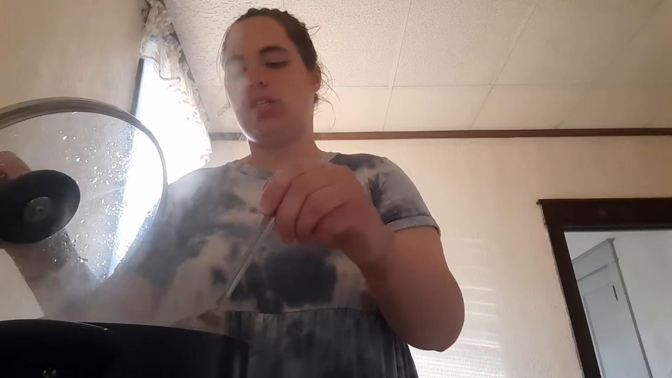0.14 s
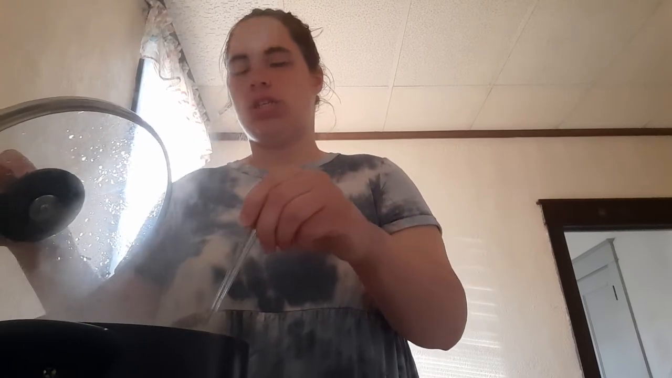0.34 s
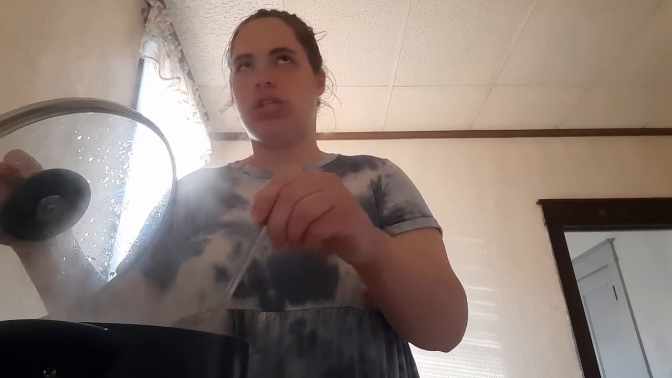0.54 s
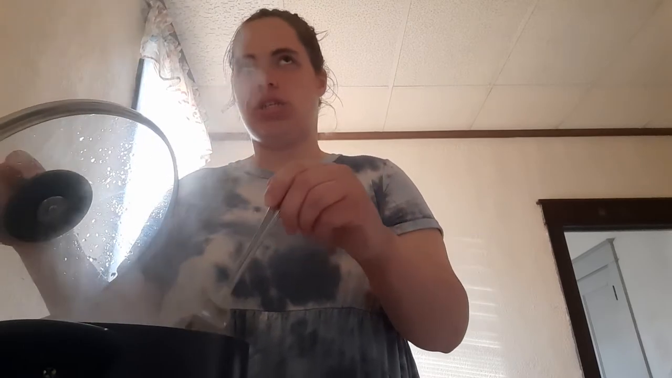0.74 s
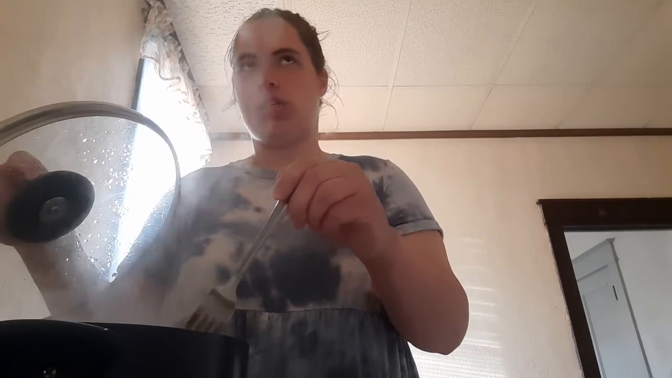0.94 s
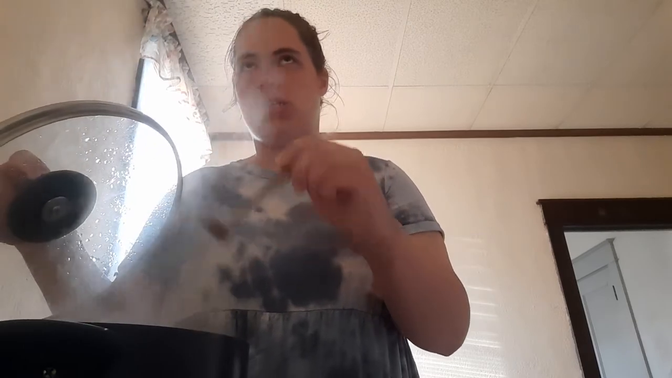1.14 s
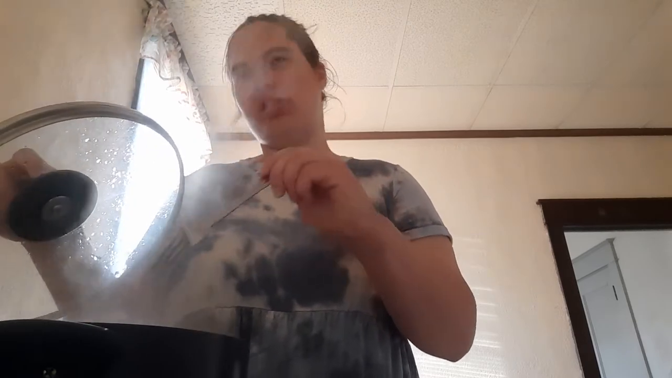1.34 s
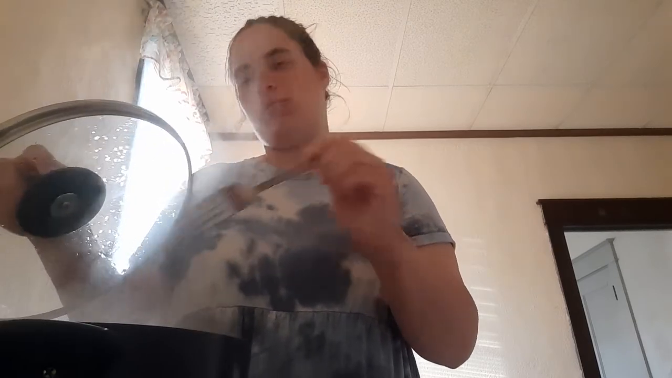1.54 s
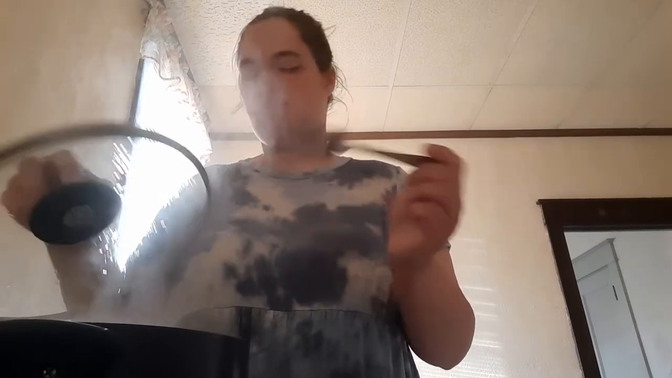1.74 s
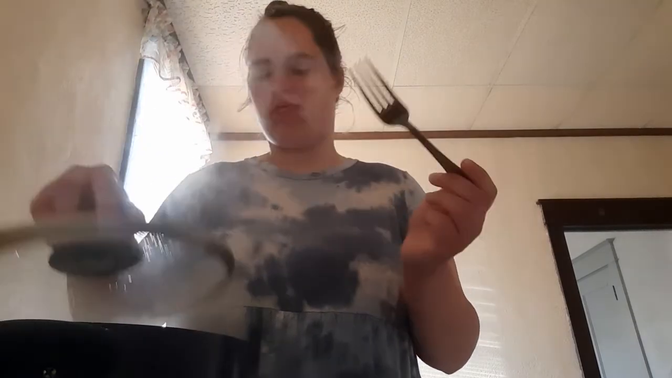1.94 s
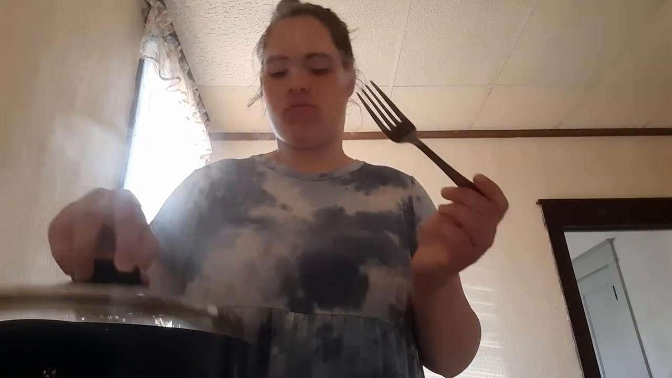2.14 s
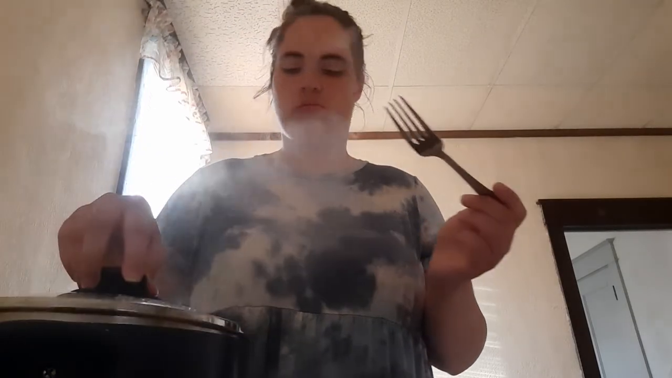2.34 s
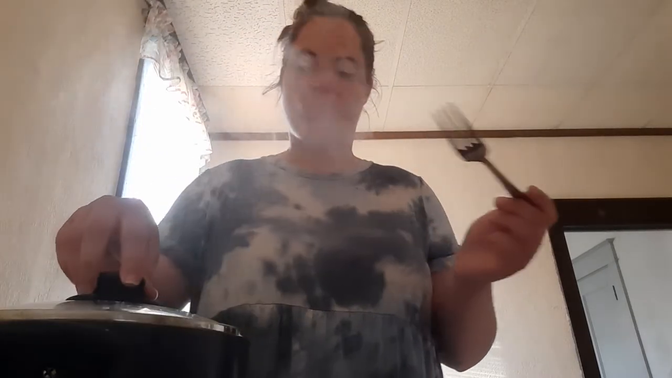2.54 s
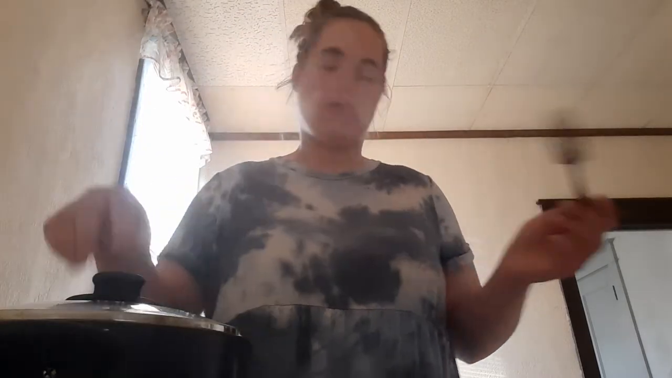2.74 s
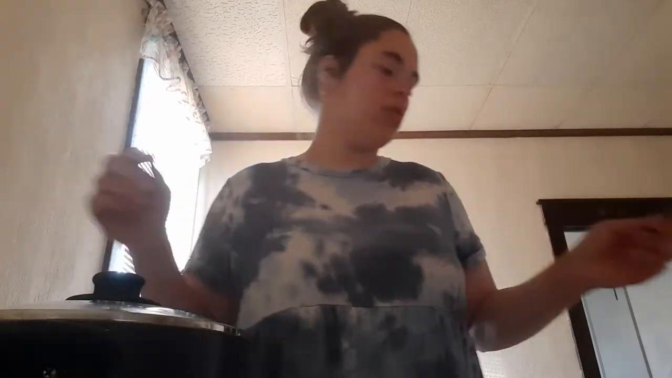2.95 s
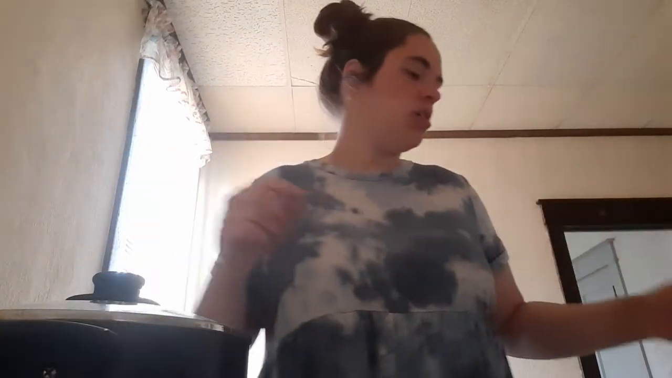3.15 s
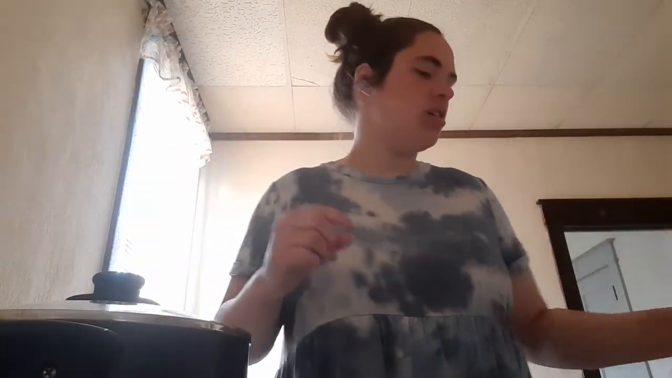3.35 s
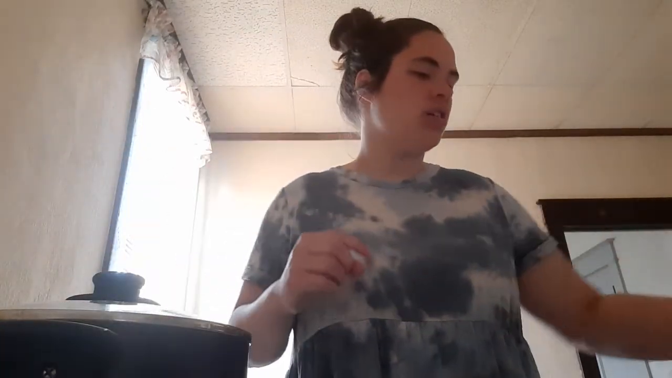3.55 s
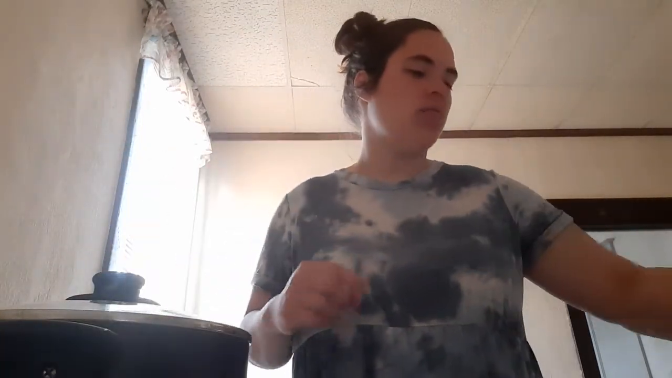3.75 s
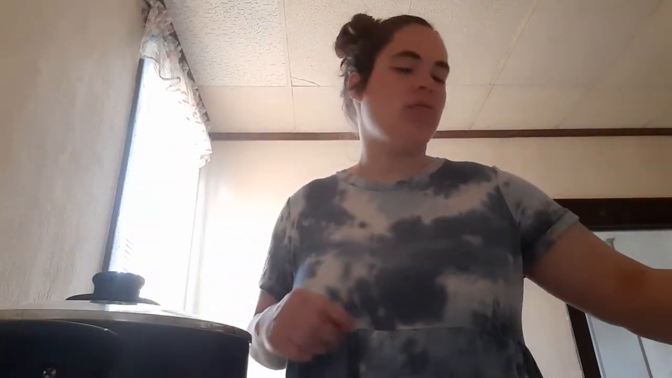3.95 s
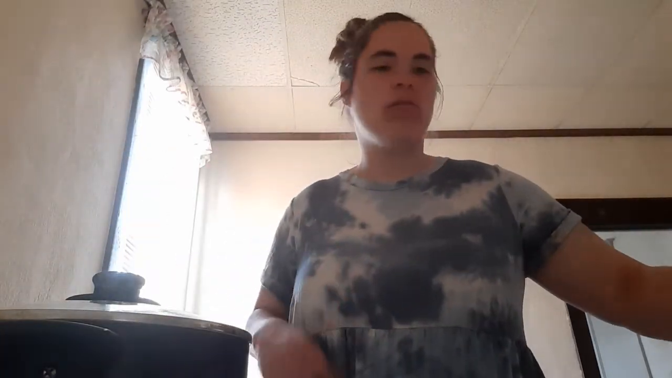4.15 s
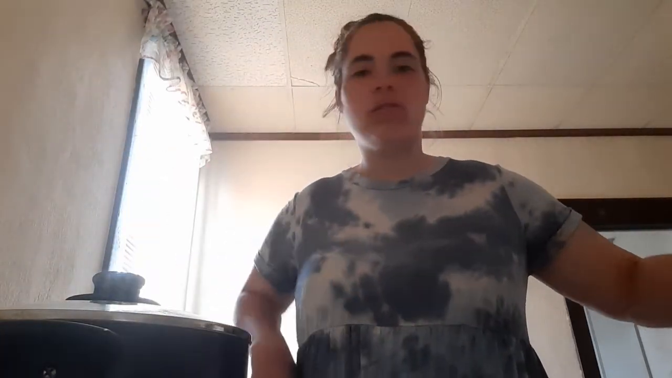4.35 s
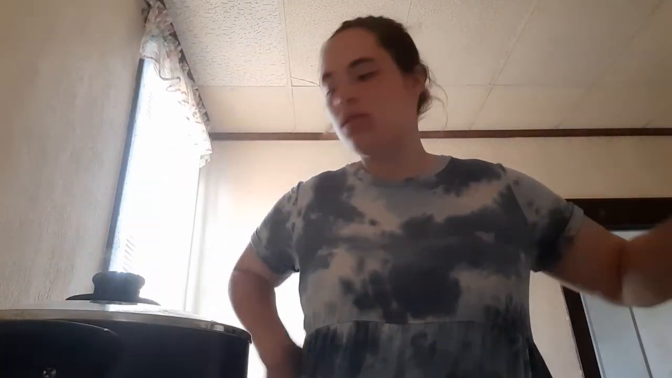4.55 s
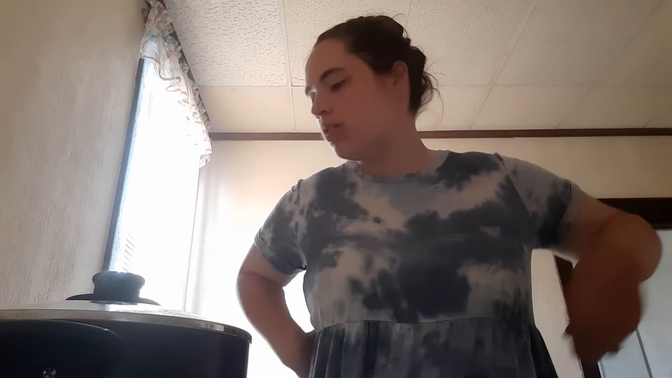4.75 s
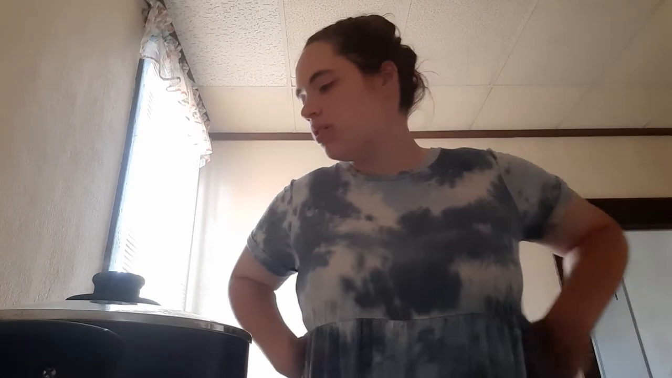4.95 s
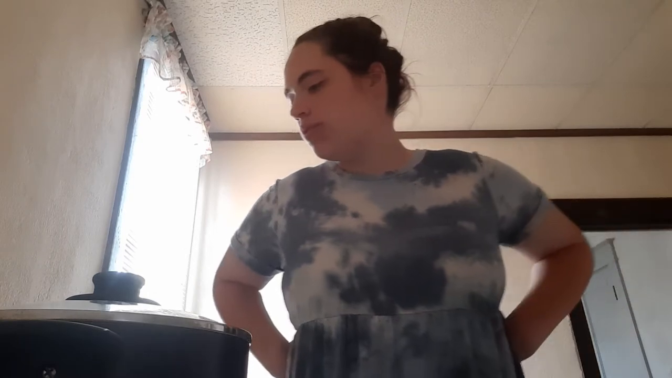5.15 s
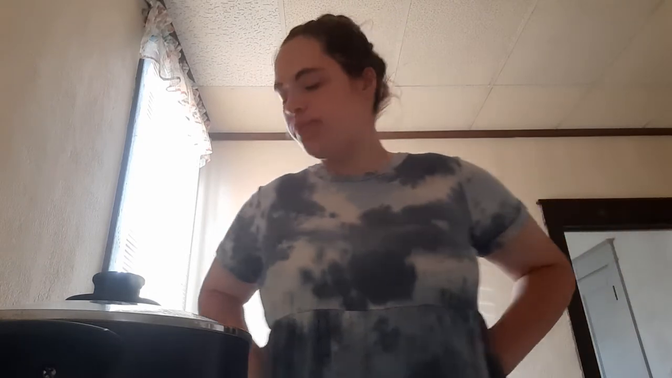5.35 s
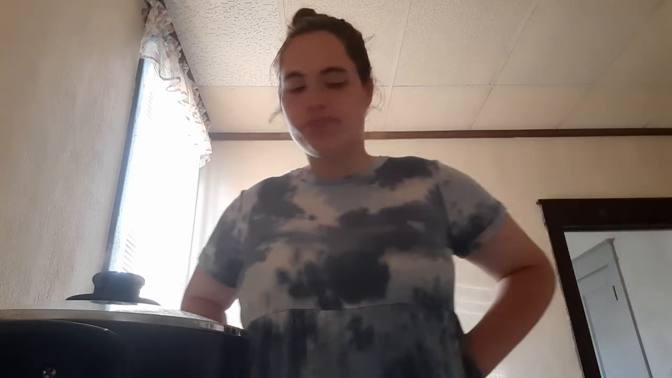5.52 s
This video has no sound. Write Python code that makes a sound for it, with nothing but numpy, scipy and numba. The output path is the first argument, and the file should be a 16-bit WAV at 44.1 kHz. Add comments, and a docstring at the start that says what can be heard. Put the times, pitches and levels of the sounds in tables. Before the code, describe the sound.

Close bubbling and steam, faint fork touches, a quick rocking lid clank, and later a metal fork rattling down onto a worktop.

```python
"""Lid and fork beside a boiling pot

Potatoes boil in a steel pot in a small kitchen while a fork prods them with light touches and plops.
A glass lid rocks into its seat, as knocks and decaying modes; the fork is put down on a hard top and
chatters to rest in ever quicker taps. Gliding bubbles, churning and droplets over filtered noise make the
water and steam, close to a two-port microphone whose gain sinks in loud moments and creeps back."""
import sys
import numpy as np
from scipy import signal
from scipy.fft import rfft, irfft
from scipy.io import wavfile
from scipy.ndimage import uniform_filter1d
from numba import njit

SR = 44100
rng = np.random.default_rng(int(sys.argv[2]) if len(sys.argv) > 2 else 0)


def store_pcm(level_fs):
    """Save levels as 16-bit WAV."""
    pcm = np.round(np.clip(level_fs, -1, 1) * 32767).astype(np.int16)
    wavfile.write(sys.argv[1], SR, np.atleast_2d(pcm).T)


N = 250664
T = np.arange(N) / SR


def undb(db):
    """Level law: decibels to amplitude gain."""
    return 10 ** (np.asarray(db) / 20)


def unit(x):
    """Energy normalisation: each channel's squares sum to one."""
    return x / np.sqrt(np.sum(x ** 2, axis=-1, keepdims=True))


def add(out, s, x):
    """Superposition: mix x into out from time s on."""
    i = max(int(s * SR), 0)
    out[:, i:i + x.shape[-1]] += x[..., :max(N - i, 0)]


def convolve(x, response):
    """Linear filtering: pass x through an impulse response, keeping its length."""
    return signal.fftconvolve(np.atleast_2d(x), np.atleast_2d(response), axes=1)[:, :x.shape[-1]]


def colour(points, size=2048):
    """Minimum phase: the causal unit-energy response with the given (Hz, dB) spectral shape."""
    hz, db = np.transpose(points)
    grid_hz = np.arange(size // 2 + 1) * SR / size
    gain = undb(np.interp(np.log(grid_hz + 1), np.log(hz), db))
    # folding the cepstrum onto positive time makes the response causal
    cepstrum = irfft(np.log(gain))
    cepstrum[1:size // 2] *= 2
    cepstrum[size // 2 + 1:] = 0
    return unit(irfft(np.exp(rfft(cepstrum))))


def lowpass(x, hz, order=2):
    """Butterworth low-pass: a maximally flat passband below hz."""
    return signal.sosfilt(signal.butter(order, min(hz, SR / 2 - 500), fs=SR, output="sos"), x)


def wash(t60_low, t60_high, size=4096, count=15):
    """High modal density: white noise, unrelated left and right, each band decaying at its own rate."""
    t, hz = np.arange(size) / SR, np.arange(size // 2 + 1) * SR / size
    edges = np.r_[0, np.geomspace(90, SR / 2, count)]
    decay_times = np.geomspace(t60_low, t60_high, count)  # seconds to fall 60 dB
    noise, out = rfft(rng.standard_normal((2, size))), 0
    for lo, hi, t60 in zip(edges, edges[1:], decay_times):
        in_band = (hz >= lo) & (hz < hi)
        band = irfft(noise * in_band) * np.exp(-np.log(1000) * t / t60)
        # energy in proportion to bandwidth keeps the sum white
        out = out + unit(band) * np.sqrt(hi - lo)
    return unit(out)


def ring(modes, size=16384):
    """Modal synthesis: damped sines, with phases that differ less between the ports in the bass."""
    t, out = np.arange(size) / SR, 0
    for hz, db, t60 in modes:
        phase = rng.uniform(-0.96, 1, (2, 1)) * min(hz / 3000, np.pi / 2)
        decay = np.exp(-np.log(1000) * t / t60)
        out = out + undb(db) * unit(np.sin(2 * np.pi * hz * t + phase) * decay)
    return out


def knock(shape, t60_low, t60_high, rattle_db, size=16384):
    """Impact excitation: a one-sample crack and a brief dense ring, in the colour of the object."""
    burst = undb(rattle_db) * wash(t60_low, t60_high)
    burst[:, 0] += 1
    padded = np.pad(unit(burst), ((0, 0), (0, size - burst.shape[1])))
    return convolve(padded, shape)


def spring(x, hz, q):
    """Contact compliance: a second-order resonance that rings near hz and passes little above."""
    w = 2 * SR * np.tan(np.pi * min(hz, SR / 2 - 2000) / SR)
    return signal.lfilter(*signal.bilinear([w * w], [1, w / q, w * w], SR), x)


def place(x, lead_ms, left_db):
    """Interaural cues: the left port leads by lead_ms and is louder by left_db (negative: the right)."""
    size = 2 ** 18
    lag = np.maximum([-lead_ms, lead_ms], 0) / 1000  # seconds, left and right
    hz = np.arange(size // 2 + 1) * SR / size
    delay = np.exp(-2j * np.pi * lag[:, None] * hz)
    return irfft(rfft(x, size) * delay)[:, :N] * undb([[left_db / 2], [-left_db / 2]])


def walk(rate):
    """Random modulation: straight lines between normal draws, rate of them a second."""
    steps = np.arange(0, 6, 1 / rate)
    return np.interp(T, steps, rng.standard_normal(len(steps)))


def lid():
    """Impact and modal decay: the steel-rimmed glass lands on an edge, rocks and slips into its seat."""
    # Each row: start in seconds, strength in dB, contact resonance in Hz, click of the steel rim in dB.
    lid_hits = [(2.067, 9, 1480, 10), (2.1335, 9, 590, -1), (2.153, -1.5, 2400, -4), (2.1667, 13, 513, -3),
                (2.178, 14, 500, -4), (2.1863, 11, 1300, 5.5), (2.19, 1, 2470, -21), (2.257, -11, 343, -18),
                (2.268, -1.5, 347, -16), (2.288, -11.5, 2650, -8), (2.4042, 0.5, 2470, 0),
                (2.4086, 4.5, 1350, 5), (2.437, -8.5, 1530, -12)]
    # Knock colour of lid and pot. Each row: frequency in Hz, level in dB.
    lid_colour = [(40, -21.5), (75, -15), (120, 2), (250, -4.5), (450, -2), (700, 1), (1050, -13),
                  (1320, -6), (1580, -11), (2200, -6.5), (5000, -19), (9000, -22.5), (16000, -20.5)]
    # Modes of lid and pot. Each row: frequency in Hz, level in dB, 60 dB decay time in seconds.
    lid_modes = [(64.5, -26, 0.57), (120, -11.5, 0.21), (200.3, -18, 0.21), (319.4, -17, 0.13),
                 (484, -17, 0.12), (578.4, -16, 0.2), (615, -14, 0.098), (682, -21, 0.096),
                 (1240, -43, 0.076), (1316, -16, 0.035), (1677, -15, 0.15), (1853, -8.5, 0.043),
                 (2580, -17, 0.049), (3270, -23.5, 0.19), (3997, -23.5, 0.33), (5900, -28, 0.11),
                 (4920, -27.5, 0.18), (8796, -33, .04)]
    # The hand lets the lid's weight onto the pot, from first touch to rest.
    # Each row: time in seconds, gain of the bass in dB.
    lid_weight = [(2.12, -19.5), (2.21, 12)]
    rim_hz = 9500
    out, shape, modes = np.zeros((2, N)), colour(lid_colour), ring(lid_modes)
    for s, db, contact_hz, rim_db in lid_hits:
        blow = knock(shape, t60_low=0.023, t60_high=0.078, rattle_db=7.5) + modes
        # weight behind the blow shakes the whole pot
        weight = undb(np.interp(s, *np.transpose(lid_weight)))
        heavy = blow + (weight - 1) * lowpass(blow, hz=243, order=1)
        body = undb(db) * spring(heavy, contact_hz, q=1.98)
        treble = blow - lowpass(blow, hz=910, order=1)
        click = undb(rim_db) * spring(treble, rim_hz, q=0.77)
        add(out, s, body + click)
    return place(out, lead_ms=0.27, left_db=3.0)


def bounces(s, db, first_gap_s, count=15):
    """Restitution: (s, gain) of bounces that on average weaken and follow sooner, a little unevenly."""
    rebound, loss_db = 0.92, 1.04  # mean flight as a share of the last, mean loss per tap
    gap, size = rng.standard_normal((count, 2)).T
    number = np.arange(count)
    flights = first_gap_s * rebound ** number * np.exp(0.22 * gap)
    starts = s + np.cumsum(flights) - flights
    return zip(starts, undb(db - loss_db * number + 2 * size))


def fork(count=4):
    """Coupled impact: the handle knocks the board, then the tines land and buzz in quicker bounces."""
    # Each row: start in seconds, knock on the board in dB, contact resonance in Hz, clash of tines in dB.
    fork_hits = [(3.862, 16, 6000, 2.5), (3.879, 5, 8000, -1), (3.896, 8, 1070, -21),
                 (3.994, -9, 1780, -20), (4.035, 2.5, 575, -22), (4.1003, 13, 5630, -3.5),
                 (4.1107, 6.5, 5600, -4), (4.142, 2, 5000, -4.5), (4.1685, 20, 482, 16),
                 (4.1972, 8.5, 3000, 11)]
    # Each end of the fork chatters to rest.
    # Each row: start in seconds, strength in dB, mean first gap between bounces in seconds.
    chatter = [(4.179, 10, .0088), (4.254, 8.5, .0062)]
    # Knock colour of the worktop. Each row: frequency in Hz, level in dB.
    board_colour = [(45, -33), (100, -21), (250, 2.5), (420, -11.5), (780, 3.5), (1060, 6), (1230, -13),
                    (1580, 3), (2050, 3.5), (3200, -7.5), (4800, -14.5), (6200, -13), (8500, -44),
                    (16000, -8.5)]
    # Modes of the worktop. Each row: frequency in Hz, level in dB, 60 dB decay time in seconds.
    board_modes = [(109.4, -27.5, 0.28), (568, -21, 0.19), (845, -15, 0.33), (1010, -31, 0.092),
                   (1660, -24, .18), (2022, -13, .14), (2460, -42, 0.19)]
    # Clash colour of the fork. Each row: frequency in Hz, level in dB.
    tine_colour = [(50, -12), (110, -14.5), (270, 2), (650, -3), (1250, -5), (1850, -1), (2700, 4.5),
                   (3300, -5.5), (4000, -0.5), (4900, -11.5), (6500, -6.5), (8800, -10), (12000, -3),
                   (16000, -12.5)]
    # Modes of the fork. Each row: frequency in Hz before detuning, level in dB before tine_ring_db,
    # 60 dB decay time in seconds.
    tine_modes = [(673, -17, .17), (1893, -13.5, .1), (2525, -18, .08), (2010, -14, .16), (2723, -13, .11),
                  (2800, -14, .025), (3922, -18, .06), (4003, -18, .06), (5772, -18, .17), (6269, -16, .1),
                  (6600, -13, .02), (7170, -23, .12), (9180, -23, .1), (10512, -21, .15), (11130, -22, .12),
                  (12376, -20, .12), (13260, -21, .14), (14097, -17, .11), (15630, -22, .06)]
    tine_ring_db = 0.5
    out, board, board_ring = np.zeros((2, N)), colour(board_colour), ring(board_modes)
    tines = colour(tine_colour)
    # the way the fork touches the board detunes it slightly; the contacts take these rings in turn
    tine_rings = []
    for _ in range(count):
        detuned = [(hz * (1 + 0.0012 * rng.standard_normal()), db + tine_ring_db, t60)
                   for hz, db, t60 in tine_modes]
        tine_rings.append(ring(detuned))
    for k, (s, board_db, contact_hz, tine_db) in enumerate(fork_hits):
        thud = knock(board, t60_low=0.084, t60_high=0.044, rattle_db=3.0) + board_ring
        clash = knock(tines, t60_low=0.055, t60_high=0.047, rattle_db=22) + tine_rings[k % count]
        add(out, s, undb(board_db) * spring(thud, contact_hz, q=1.25) + undb(tine_db) * clash)
    # every bounce lands on another spot, so no two taps are alike
    for run in chatter:
        for k, (s, gain) in enumerate(bounces(*run)):
            tap = knock(tines, t60_low=0.011, t60_high=0.024, rattle_db=7.5) + tine_rings[k % count]
            add(out, s, gain * tap)
    return place(out, lead_ms=-0.13, left_db=1.1)


def ticks():
    """Damped resonance: light touches and plops, each a broad burst with a brief clink at its centre."""
    # Each row: start in seconds, strength in dB, pitch in Hz.
    touches = [(0.516, -23, 3870), (.862, -22, 2180), (.951, -22.5, 2770), (.951, -17.5, 9900),
               (1.281, -20.5, 410), (1.507, -20, 875), (1.54, -18, 2070), (1.57, -19, 454),
               (5.055, -20, 2160)]
    t60 = 0.055  # seconds
    out = np.zeros((2, N))
    for s, db, hz in touches:
        shape = colour([(hz / 6, -20), (hz, 0), (hz * 4, -20)])
        burst = convolve(wash(t60, t60), shape)
        clink = ring([(hz, -6, t60)], size=4096)
        add(out, s, undb(db) * (burst + clink))
    return out


def cloth(s=4.71, db=-42):
    """Friction noise: a hand brushes the dress, heard as coloured noise in one uneven stroke."""
    fabric = colour([(150, -22), (450, -12), (850, -9.0), (1300, -22.0), (4000, -30), (7000, -24),
                     (15000, -35)])  # Hz, dB
    rub = convolve(rng.standard_normal((2, N)), fabric)
    stroke = np.exp(-.5 * ((T - s) / .055) ** 2) * undb(2.5 * walk(60))
    return undb(db) * rub * stroke


def bubbling(count=2200):
    """Bubble resonance: damped sines, lower ones lasting longer, glide up at random moments."""
    out = np.zeros((2, N))
    for when, pitch, size, side in rng.random((count, 4)):
        hz = 220 * 5.5 ** pitch
        age = np.linspace(0, 1, int(14 * SR / hz))  # 0 to 1 over about 14 cycles
        pop = np.sin(2 * np.pi * 14 * age * (1 + 0.036 * age)) * np.exp(-5 * age)
        pan = np.sqrt([[side], [1 - side]])
        add(out, when * N / SR, undb(18 * size) * pan * pop)
    return out


def boiling_water():
    """Turbulence and bubble resonance: churning noise with bubbles beneath, in the colour of the pot."""
    # Each row: frequency in Hz, level in dB.
    water_colour = [(30, -30), (62, -5.5), (100, -6.5), (200, -10), (310, -0.5), (480, 0), (800, -0.5),
                    (1200, -12.5), (2200, -14.5), (3500, -23), (8000, -38)]
    water_db = -50  # mean level before placing
    churn = rng.standard_normal((2, N))
    churn = churn + 0.44 * rng.standard_normal(N)  # part of the churning reaches both ports alike
    mixture = unit(churn) + undb(-20.0) * unit(bubbling())
    water = np.sqrt(N) * unit(convolve(mixture, colour(water_colour)))
    return place(water * undb(water_db + 1.3 * walk(9.9)), lead_ms=0.089, left_db=-1.0)


def steam_flicker():
    """Random modulation: the hiss wavers only slightly (dB)."""
    return .8 * walk(25)


def steam_hiss():
    """Jet noise and droplet impulses: hiss and spray excite the air in the pot, which sings faintly."""
    # Each row: frequency in Hz, level in dB.
    steam_colour = [(400, -8), (1400, -5.5), (2400, 0), (3300, -2.5), (5500, -4), (7500, 0.5), (9700, -5.5),
                    (11500, 3), (13500, 1.5), (15500, -4.5)]
    # Steam wafting from the pot. Each row: time in seconds, level in dB before steam_gain_db.
    steam_levels = [(0.0, -55), (0.38, -54), (0.97, -51.5), (1.43, -53.5), (2.0, -50)]
    # Modes of the air in the pot. Each row: frequency in Hz, level in dB, 60 dB decay time in seconds.
    pot_air = [(1670, -21.5, 0.01), (2150, -19.5, 0.044), (2680, -19, 0.046)]
    steam_gain_db = 3
    lid_on_s, lid_muffle_db = 2.7, -1  # the closed lid holds back some of the hiss
    level_db = np.interp(T, *np.transpose(steam_levels)) + steam_gain_db + lid_muffle_db * (T > lid_on_s)
    bursts = rng.random(N) < 1500 / SR  # about 1500 droplets a second
    sizes = undb(3.8 * np.minimum(rng.exponential(size=(2, N)), 5))
    spray = bursts * sizes * rng.choice([-1, 1], (2, N))
    mixture = unit(rng.standard_normal((2, N))) + undb(-5.5) * unit(spray)
    steam = np.sqrt(N) * unit(convolve(mixture, colour(steam_colour)))
    steam = steam + convolve(steam, ring(pot_air, size=4096))
    return place(steam * undb(level_db + steam_flicker()), lead_ms=0, left_db=6.0)


def kitchen(x, wet_db, t60_low, t60_high, gap_s):
    """Reverberation: near walls and a low ceiling answer after a few milliseconds with a diffuse tail."""
    # Each row: frequency in Hz, level in dB.
    room_colour = [(40, -3.5), (100, 5), (200, 2), (600, 3), (2000, 0), (6000, 2), (15000, 1)]
    tail = convolve(wash(t60_low, t60_high, size=32768), colour(room_colour))
    delayed = np.pad(tail, ((0, 0), (int(gap_s * SR), 0)))
    return x + undb(wet_db) * convolve(x, delayed)


@njit
def ducking(loud, fall, hold, rise):
    """Attack, hold and release: gain in dB falls with loud (0-1), holds some samples, rises to zero."""
    out, db, quiet = np.zeros(len(loud)), 0., 0.
    for i in range(len(loud)):
        quiet = 0. if loud[i] > 0 else quiet + 1
        db = min(db + rise, 0.) if quiet > hold else db - fall * loud[i]
        out[i] = db
    return out


def gain_control(x, knee_db=6):
    """Level feedforward: loud sound, bass least, turns the recorder down; the boil sinks and returns."""
    loud_db, hold_s = -30, 0.89  # threshold, and the wait before recovery
    duck_db_per_s, recover_db_per_s = 21, 5
    treble = x - lowpass(x, hz=900, order=1)
    power = uniform_filter1d(np.mean(treble ** 2, axis=0), size=441)  # over 10 ms
    level_db = 10 * np.log10(np.abs(power) + 1e-12)
    loud = np.clip((level_db - loud_db) / knee_db, 0, 1)
    return x * undb(ducking(loud, duck_db_per_s / SR, float(hold_s * SR), recover_db_per_s / SR))


def scene():
    """Direct-to-reverberant ratio: the lid is close; the fork lands further off, with more room."""
    near = kitchen(lid() + ticks(), wet_db=-5.5, t60_low=0.31, t60_high=0.35, gap_s=0.0075)
    far = kitchen(fork(), wet_db=-2.0, t60_low=0.42, t60_high=0.17, gap_s=.005)
    return near + far + boiling_water() + steam_hiss() + cloth()


def record(dry):
    """Mid-side width and recorder chain: drop rumble, ride the gain, round peaks and cut the top."""
    # Stereo width of the two close ports. Each row: frequency in Hz, gain of their difference in dB.
    port_width = [(60, 0.5), (125, -11), (280, -4), (600, -6.5), (1200, 7), (2000, -2), (4000, 0.5),
                  (9000, -0.5), (15000, 0)]
    hz, db = np.transpose(port_width)
    grid_hz = np.arange(N // 2 + 1) * SR / N
    width = undb(np.interp(np.log(grid_hz + 1), np.log(hz), db))
    side = irfft(rfft(dry[0] - dry[1]) * width, N) / 2
    ports = dry.mean(axis=0) + np.array([side, -side])
    ports = signal.sosfilt(signal.butter(5, 53, "highpass", fs=SR, output="sos"), ports)
    rounded = np.tanh(.8 * gain_control(ports)) / .8
    top_cut = signal.ellip(10, .2, 80, 16000, fs=SR, output="sos")  # steep low-pass at 16 kHz
    return signal.sosfilt(top_cut, rounded)


dry = scene()
out = record(dry)
store_pcm(out)
```